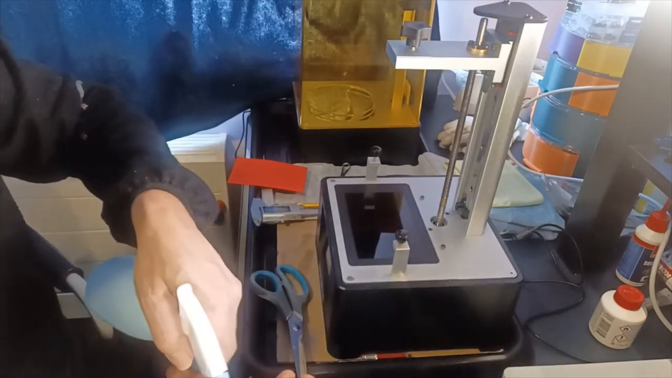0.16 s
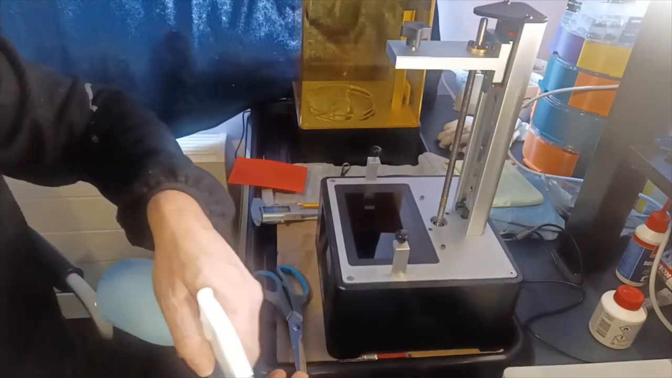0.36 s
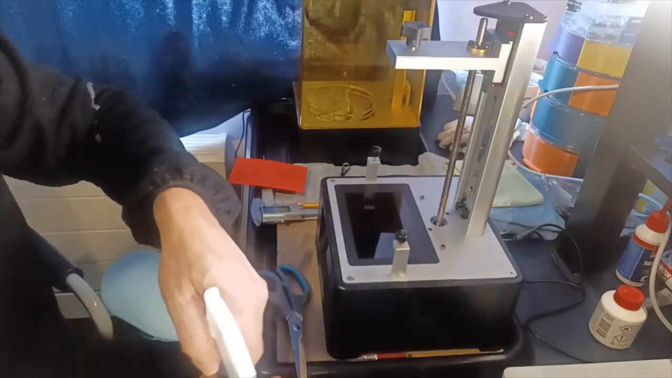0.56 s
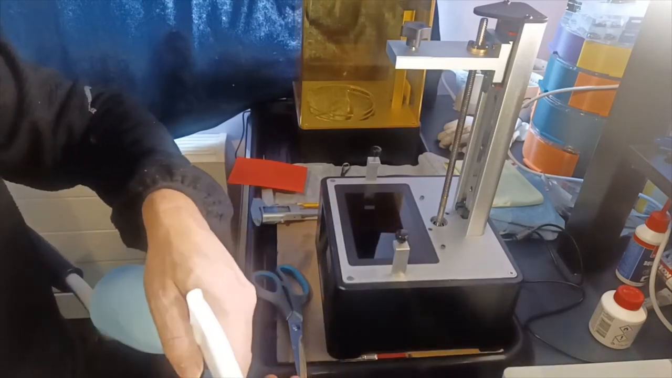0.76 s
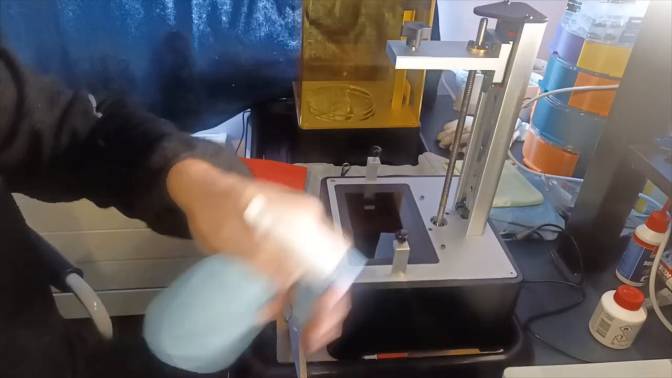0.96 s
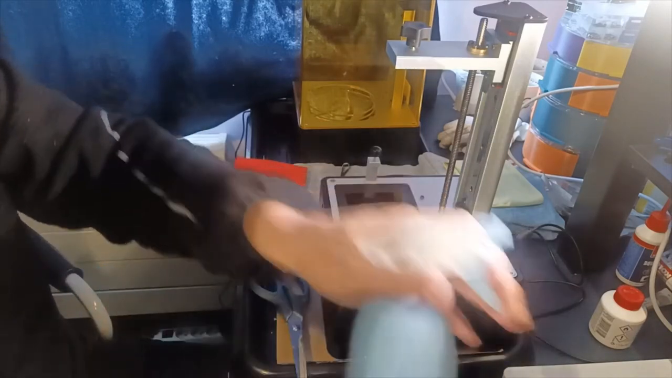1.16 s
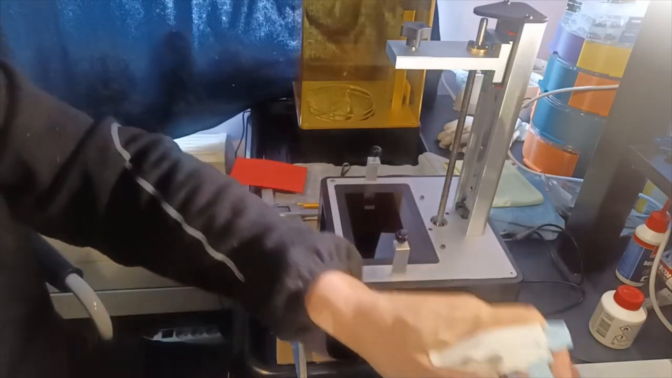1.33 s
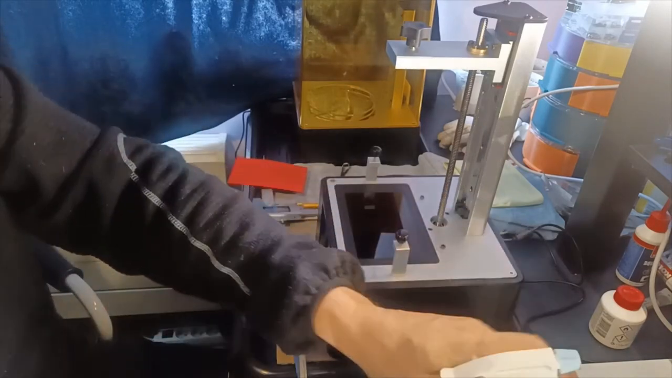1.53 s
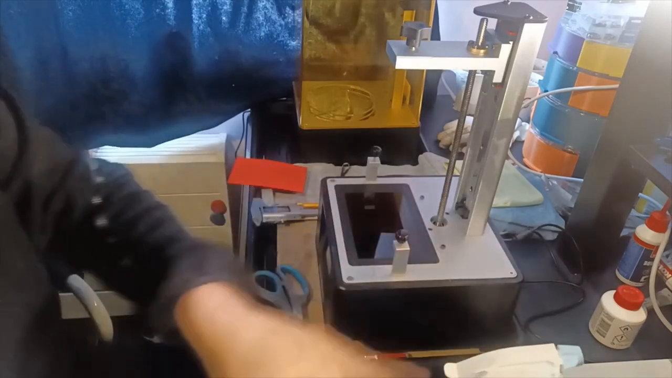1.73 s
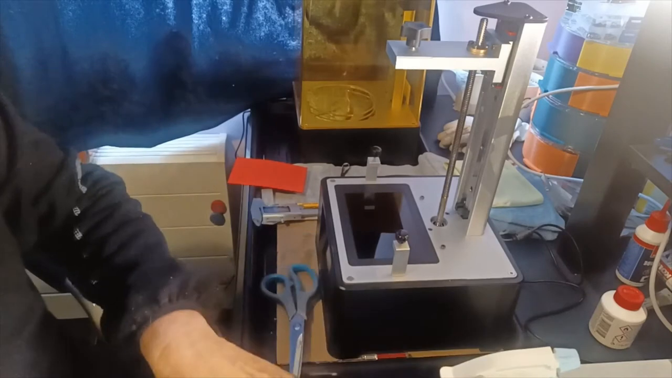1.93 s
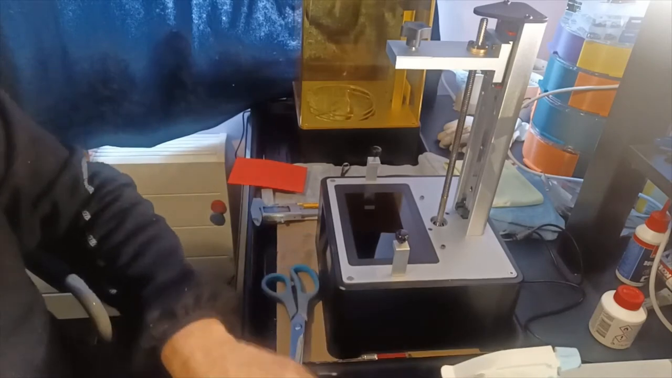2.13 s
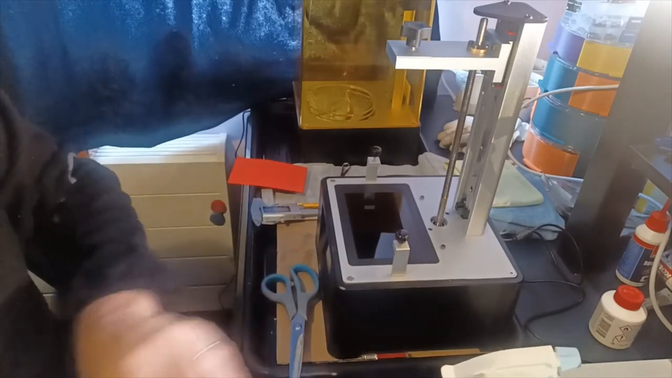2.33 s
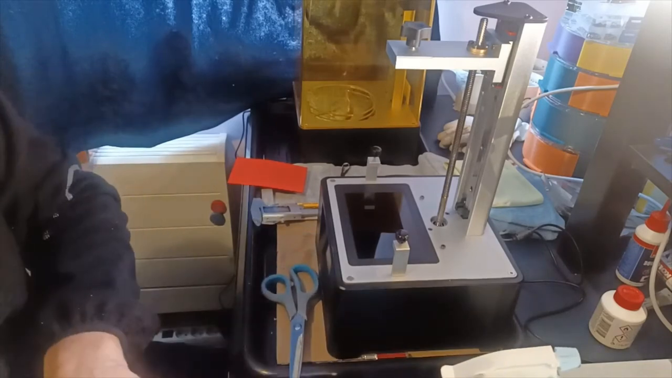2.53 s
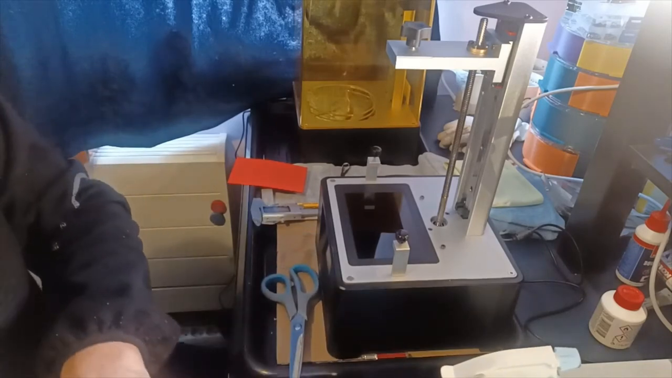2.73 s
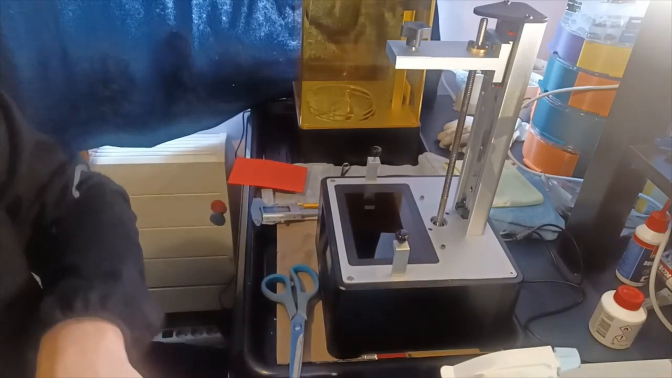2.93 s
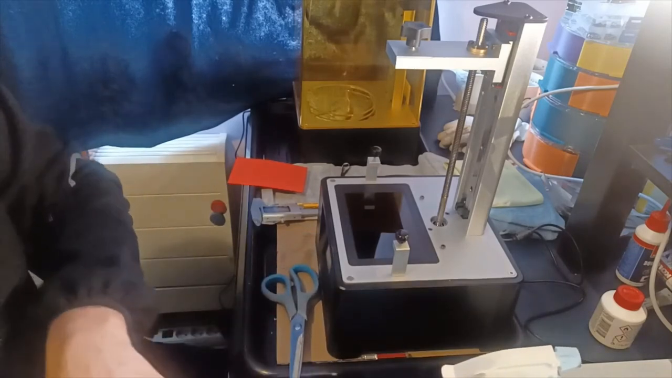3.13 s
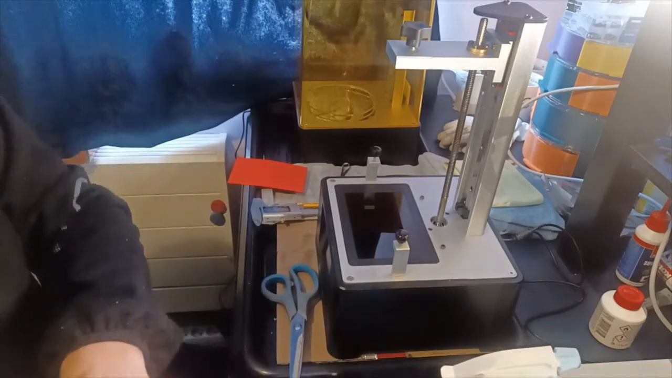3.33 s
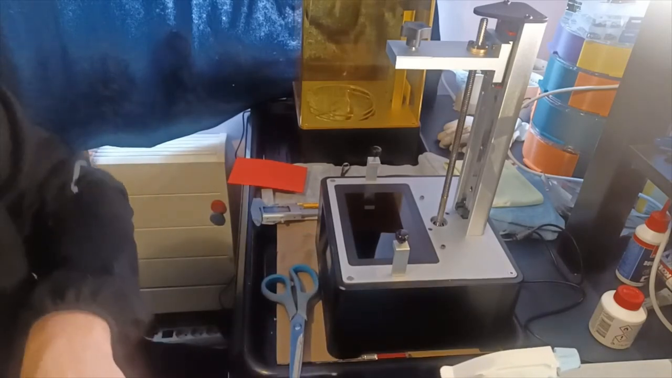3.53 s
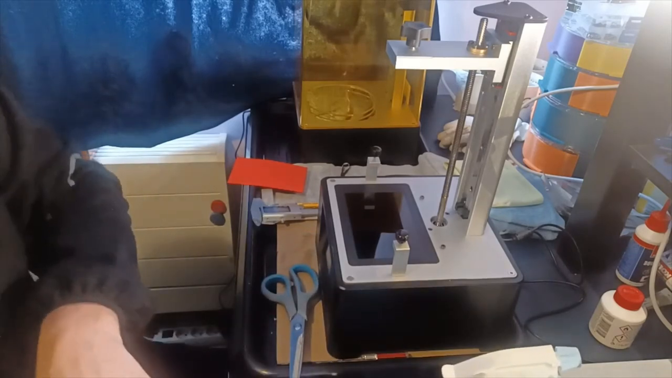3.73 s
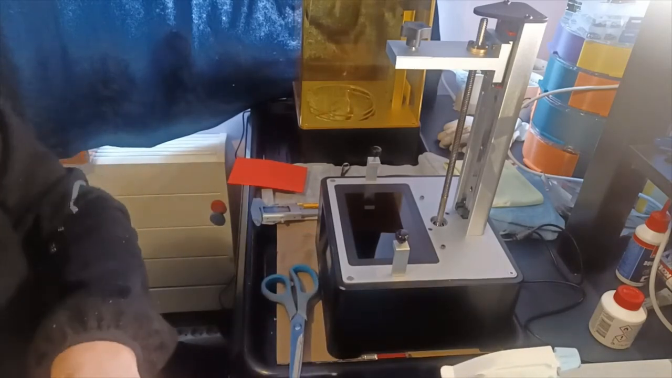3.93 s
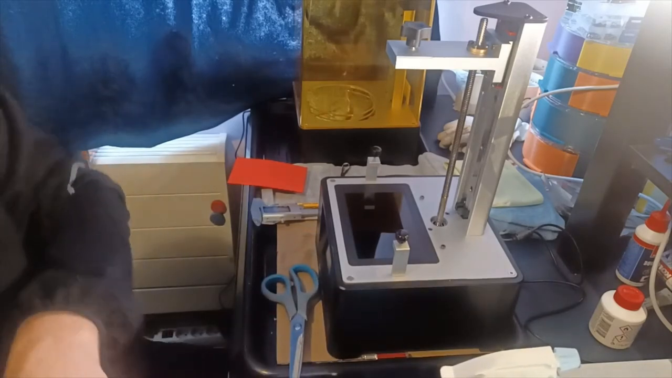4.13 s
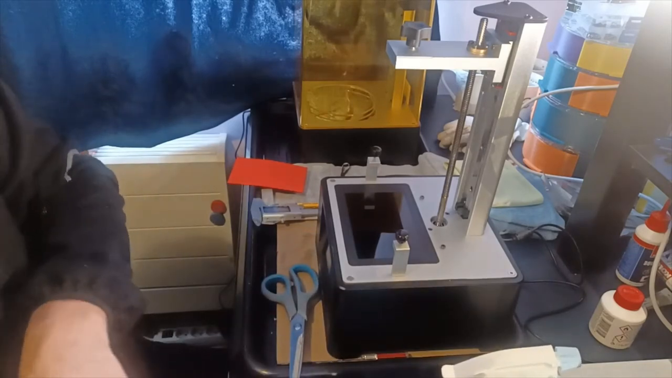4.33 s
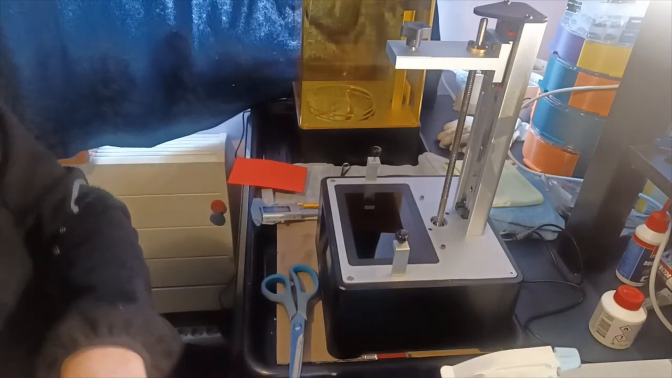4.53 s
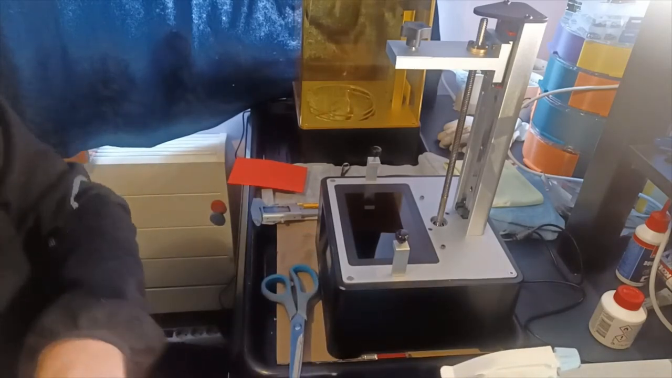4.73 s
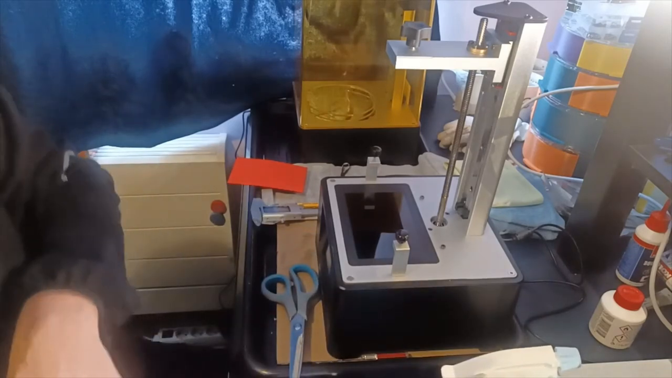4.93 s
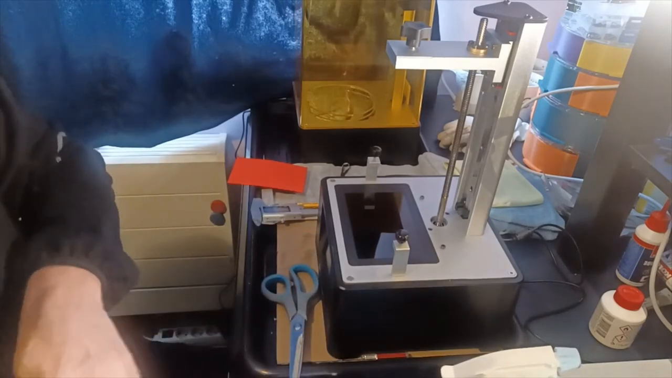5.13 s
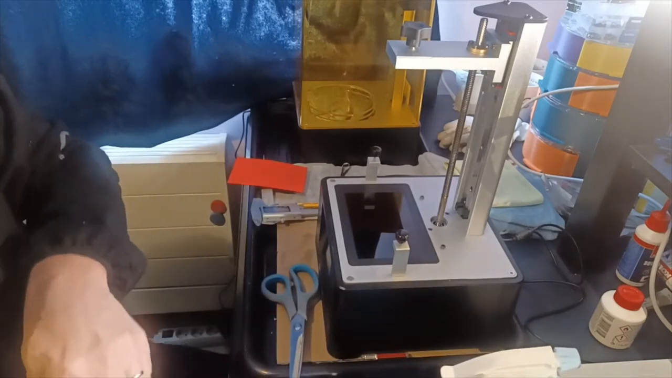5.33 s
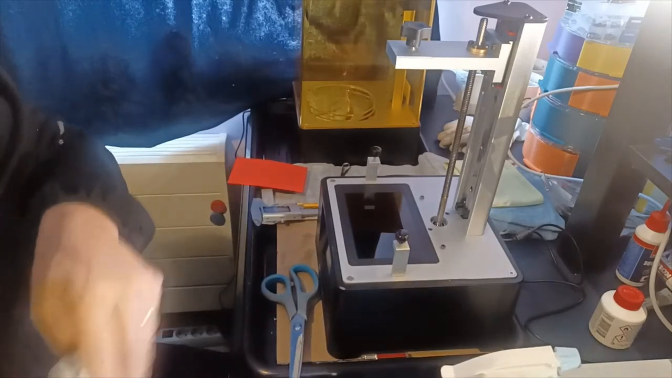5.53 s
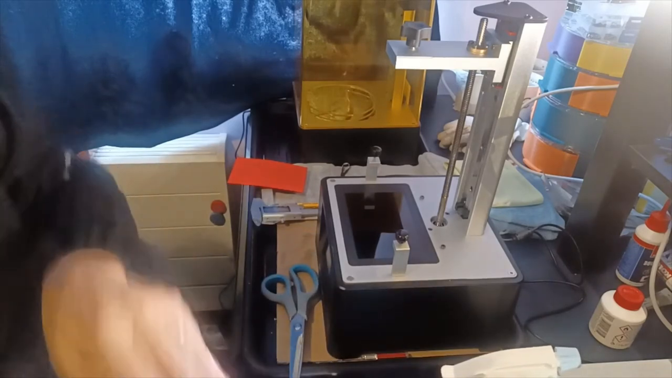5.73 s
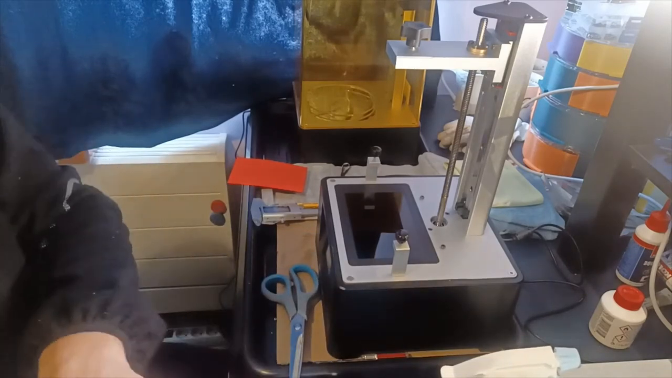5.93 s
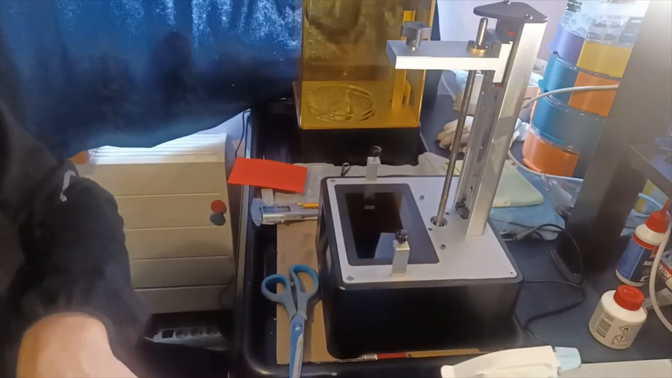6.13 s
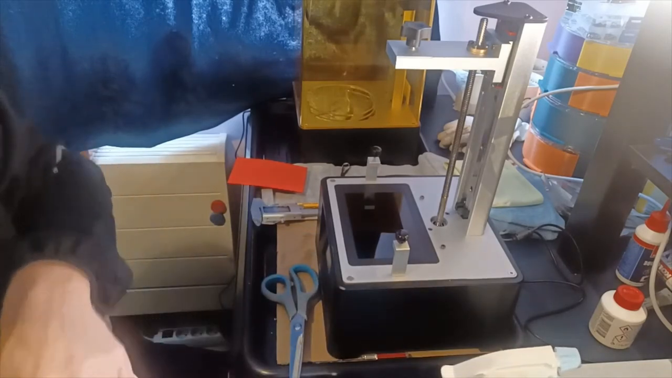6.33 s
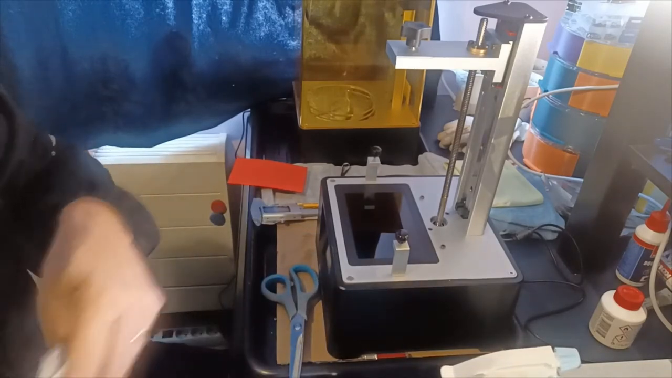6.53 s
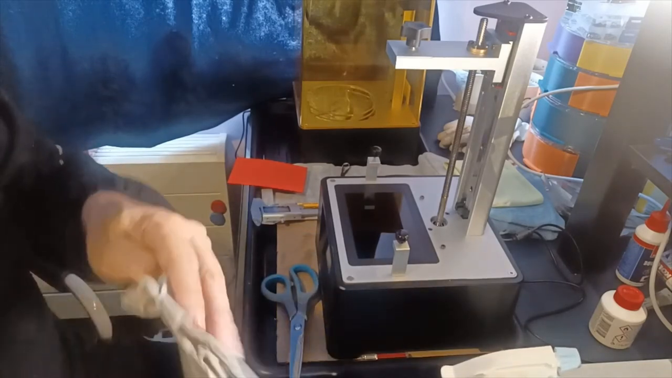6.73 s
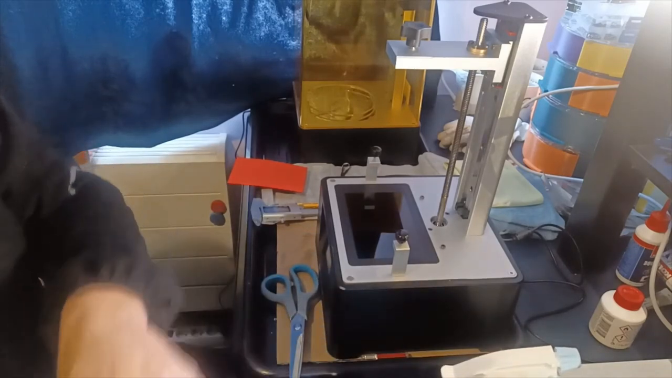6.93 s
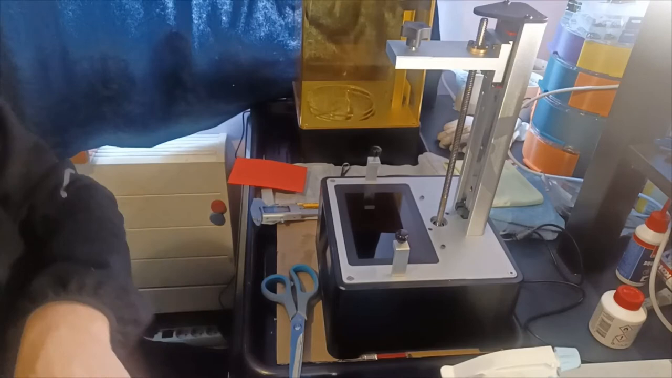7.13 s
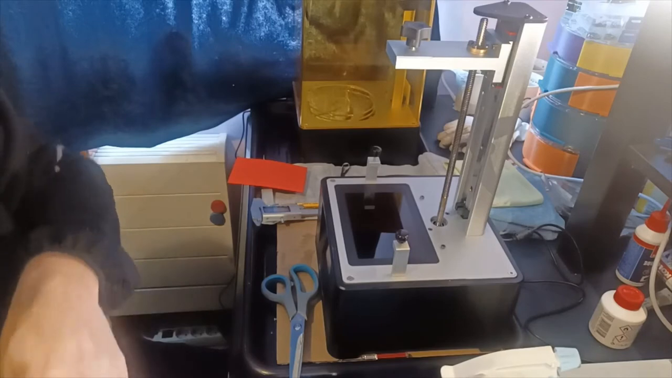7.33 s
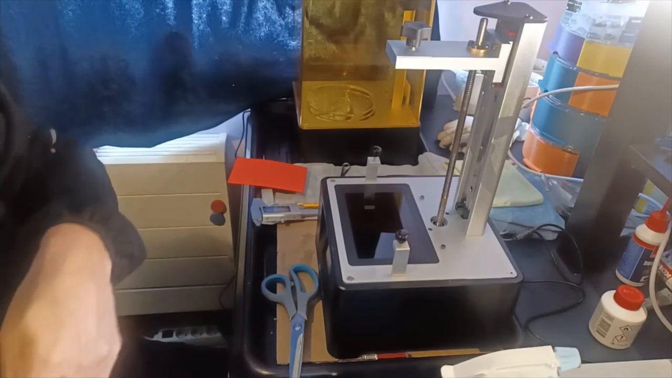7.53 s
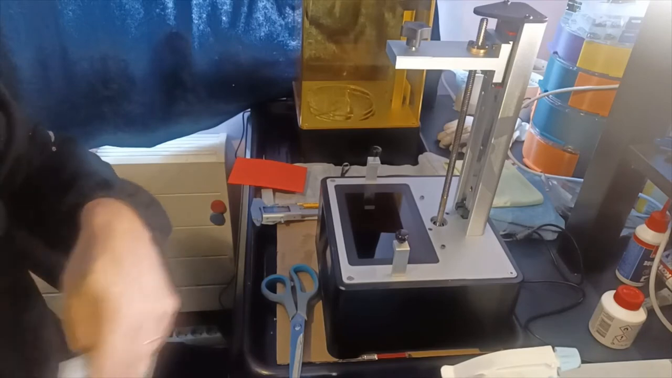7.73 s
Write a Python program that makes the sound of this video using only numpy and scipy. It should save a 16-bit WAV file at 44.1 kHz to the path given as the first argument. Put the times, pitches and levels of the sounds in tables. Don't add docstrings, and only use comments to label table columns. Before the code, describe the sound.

A small furnished room, heard close in stereo, with very faint hiss and low rumble. At once a trigger bottle spits a sputter, then a fuller squirt until about 0.3 s: airy mist over a narrow whistle that sags in pitch. The trigger clicks back sharply near 0.46 s, with tiny clicks and sleeve rustle up to 1.3 s. At 1.48 s the bottle meets the desk with a dull, boomy thud and click; from 1.9 to 2.15 s it lands again, rocking and scraping in softer knocks, then stops abruptly. From 2.5 s a cloth rubs in short, dry, quiet strokes. Small parts tick and knock irregularly, notably at 2.9, 3.0 and 3.4 s, with the sharpest crack near 4.6 s. Activity thins after 5.4 s, with faint strokes and ticks around 6 s, a near-silent gap, then a clearer tick and brief rub at 7.15 s and last tiny clicks by 7.4 s.

```python
import sys
import numpy as np
from scipy import signal
from scipy.fft import rfft, irfft, next_fast_len
from scipy.io import wavfile
from scipy.ndimage import uniform_filter1d

SR = 44100
rng = np.random.default_rng(int(sys.argv[2]) if len(sys.argv) > 2 else 0)


def rack_gain(trim_db):
    fader = np.asarray(trim_db, float)
    return 10 ** (fader / 20)


def dump_mix(stems):
    frames = np.atleast_2d(stems).T
    limited = np.clip(frames, -1, 1)
    pcm = np.round(limited * 32767).astype(np.int16)
    wavfile.write(sys.argv[1], SR, pcm)


N = 342877
T = np.arange(N) / SR
PORT_HZ = 7640


def unit(x):
    return x / np.sqrt(np.mean(x ** 2))


def band(x, hz, width_hz):
    return signal.lfilter(*signal.iirpeak(hz, hz / width_hz, fs=SR), x)


def passband(x, lo_hz, hi_hz):
    return signal.sosfilt(signal.butter(2, [lo_hz, hi_hz], "bandpass", fs=SR, output="sos"), x)


def curves(table, size):
    s, first, *rest = np.transpose(table)
    t = T[:size]
    return [np.interp(t, s, first, -150, -150)] + [np.interp(t, s, column) for column in rest]


def walk(rate_hz, size=N):
    hold = int(SR / rate_hz)
    levels = np.repeat(rng.standard_normal(size // hold + 1), hold)[:size]
    return 1.2 * uniform_filter1d(levels, hold)


def add(out, x, s):
    i = int(s * SR)
    out[..., i:i + x.shape[-1]] += x[..., :N - i]


def pair(x):
    delay = np.sinc(np.arange(32) - 10 - 5.5) * np.hanning(32)
    return np.array([x, np.convolve(x, delay)[10:len(x) + 10]])


def echoes(size=SR // 2):
    # pitch_hz, t60_s
    room_decay = [(200, 0.3), (1000, 0.11), (4000, 0.11), (12000, 0.029)]
    room_hz, room_t60 = np.transpose(room_decay)
    t, out = T[:size], 0
    for hz in 125 * 2. ** np.arange(8):
        t60 = np.interp(np.log(hz), np.log(room_hz), room_t60)
        shared, own = rng.standard_normal(size), rng.standard_normal((2, size))
        apart = min(hz / 900, 1)
        noise = np.sqrt(1 - apart) * shared + np.sqrt(apart) * own
        octave = passband(noise, hz / 2 ** .5, min(hz * 2 ** .5, 20000))
        out = out + octave * rack_gain(-60 * t / t60) / np.sqrt(t60)
    out = out * np.clip(t / 0.0008 - .3, 0, 1)
    return out / np.sqrt(np.mean(np.sum(out ** 2, axis=1)))


def in_room(x, room, wet_db):
    return pair(x) + rack_gain(wet_db) * signal.fftconvolve(x[None], room, axes=1)[:, :len(x)]


def strokes():
    # start_s, length_s, level_db,
    # brightness_db
    brushings = [(0.51, 0.11, -63, -11.5), (0.645, .08, -67.5, -17), (0.976, 0.29, -76, -3),
                 (1.2, .16, -71, -2), (1.62, 0.13, -65.5, -18), (1.931, 0.127, -52, -8.5),
                 (2.147, 0.058, -61.5, -3.5), (2.348, 0.035, -67.5, -4),
                 (2.541, 0.3, -62.5, -1), (2.692, 0.034, -58, -1.5), (2.891, 0.042, -54.5, 1),
             (3.007, .13, -61.5, 3.5), (3.21, 0.19, -60, 1.3), (3.454, 0.057, -52, 0.5),
             (3.57, 0.26, -66.5, 3.5), (3.863, 0.069, -59, 4), (4.042, .06, -54, 2.5),
             (4.144, 0.12, -59.5, 4), (4.391, 0.052, -56, 6.5), (4.495, 0.11, -47.5, -5.5),
             (4.694, 0.15, -58.5, 1.5), (4.915, 0.11, -56, -0.5), (5.221, 0.027, -57, -11),
             (5.352, 0.014, -62, -3.5), (5.897, .04, -59.5, -11.5), (5.995, .12, -55, 2),
             (6.211, 0.071, -65, 3), (6.382, 0.024, -55.5, -10.5), (7.073, 0.014, -57.5, -0.5),
             (7.15, .13, -61.5, 1), (7.376, 0.013, -52.5, -3)]
    rise_db_s, fall_db_s, at_rest_db = 250, 194.5, -84
    t = T[::64]
    start, length, db, bright_db = np.transpose(brushings)[..., None]
    rise_db = rise_db_s * np.maximum(start - t, 0)
    fall_db = fall_db_s * np.maximum(t - start - length, 0)
    shape = db - rise_db - fall_db
    bass_db = -5.5 - 0.11 * bright_db
    colours = [(0, 0), (bright_db, -7), (bass_db, .3)]  # (on a stroke dB, at rest dB)
    power = [np.sum(rack_gain(shape + on) ** 2, axis=0) + rack_gain(at_rest_db + rest) ** 2 for on, rest in colours]
    return [np.interp(T, t, 10 * np.log10(p)) for p in power]


def hiss(size=next_fast_len(N)):
    # pitch_hz, level_db (per Hz)
    noise_colour = [(12, -39), (20, 5), (27, -13.5), (65, -10.5), (150, -20.5), (182, -18.5), (210, -21.5),
                    (1120, -33), (6720, -41.5), (13200, -44), (16000, -41.5)]
    colour_hz, colour_db = np.transpose(noise_colour)
    hz = np.maximum(np.fft.rfftfreq(size, 1 / SR), 1)
    shape = rack_gain(np.interp(np.log(hz), np.log(colour_hz), colour_db))
    noise = irfft(rfft(rng.standard_normal((2, size))) * shape, size)[:, :N]
    stir = rack_gain(strokes()[0] - 10.0) * unit(passband(rng.standard_normal(N), 19, 110))
    return rack_gain(-67.5 + 4.5) * unit(noise) + stir


def rub():
    db, treble_db, bass_db = strokes()
    slips = rng.standard_normal((3, N)) * rack_gain(1.45 * rng.exponential(size=N))
    slips = 0.41 * pair(slips[0]) + 1.2 * slips[1:]
    middle = unit(passband(slips, 1700, 4300)) * rack_gain(db - 3.5)
    treble = unit(passband(slips, 3200, 18000)) * rack_gain(treble_db - 6.0 + walk(25))
    bass = unit(passband(slips, 200, 1200)) * rack_gain(bass_db - 1.5 + walk(26))
    return rack_gain(1.3 * walk(40)) * (treble - middle + bass)


def rings(size):
    # start_s, level_db, pitch_hz, swell_s, t60_s
    bottle_tones = [(.906, -48, 1690, .004, .05), (.913, -50, 1560, .004, .05),
                    (1.293, -60, 3650, .002, .03), (1.288, -63, 5200, .002, .025),
                    (1.6, -57, 1680, .06, .45), (1.581, -45, 4300, .002, .045),
                    (2.005, -35, 1310, .004, .1), (2.005, -38, 1620, .004, .08), (.47, -46, 1400, .003, .1),
                    (.205, -50, 350, .006, .09), (.62, -56, 350, .004, .07), (.692, -53, 340, .006, .12),
                    (.485, -52, 640, .01, .15), (.47, -52, 190, .01, .15)]
    out, t = np.zeros(size), T[:SR // 2]
    for s, db, hz, swell_s, t60 in bottle_tones:
        swell = np.minimum(t / swell_s, 1)
        add(out, rack_gain(db - 60 * t / t60) * swell * np.sin(2 * np.pi * hz * t), s)
    return out * rack_gain(4.5 * walk(160, size=size))


def desk(size):
    # start_s, force_db, contact_s
    blows = [(1.478, -6, 0.0015), (1.491, -10, 0.0017), (1.5, -13.5, 0.00029), (1.519, -13, 0.0008),
             (1.905, -20, 0.00059), (1.964, -17.5, 0.0015), (2.007, -32, 0.00071), (2.025, -18.5, 0.00093),
             (2.109, -29.5, 0.0011), (1.888, -21, 0.0042), (2.065, -15.5, 0.0057), (2.14, -25, 0.0056)]
    # start_s, level_db
    scrape = [
        (1.86, -82),
        (1.936, -51.5),
        (2.056, -58),
        (2.182, -76),
        (2.26, -87),
    ]
    # pitch_hz, level_db, t60_s
    modes = [(75.4, -9.5, 0.8), (131.5, -2, 0.34), (172.7, -18.0, 0.49), (269.5, -7.5, 0.19),
             (356, -17, 0.2), (575, -8, 0.058), (625, -19, 0.15), (769, -23.5, 0.17), (850, -25, 0.17),
             (1190, -51, 0.57), (1210, -19.0, 0.18), (1400, -32, 0.19), (1560, -31.5, 0.15),
             (2230, -40, 0.78), (426, -16, 0.15), (492.4, -15.5, 0.28), (227.4, -13, 0.08),
             (118.0, -18.5, 0.56), (67.7, -14, 0.76), (148.5, -26, 0.28)]
    rolled_over_s, node_db = 1.8, -8
    hand_damping = 0.87
    shut_s, shut_db_s = 2.19, 260
    push = np.zeros((len(modes), size))
    spots = rack_gain(1.6 * rng.standard_normal((len(blows), len(modes))))
    node = np.array([200 < hz < 300 for hz, *_ in modes])
    for (s, db, contact_s), spot in zip(blows, spots):
        shape = np.hanning(max(int(contact_s * SR), 3) + 2)
        force_db = db - 10.0 + node_db * (s > rolled_over_s) * node
        add(push, (rack_gain(force_db) * spot)[:, None] * shape / shape.sum(), s)
    grit = rng.standard_normal(size) * rack_gain(1.16 * rng.exponential(size=size))
    grit = rack_gain(curves(scrape, size)[0]) * grit
    out = rack_gain(14.0) * passband(grit, 330, 2200)
    for (hz, db, t60), force in zip(modes, push):
        decay = np.log(1000) / (hand_damping * min(t60, .7) * SR)
        pole = np.exp(2j * np.pi * hz / SR - decay)
        wobble = rack_gain(db + 4.5 * walk(32, size=size))
        out = out + wobble * signal.lfilter([1], [1, -pole], force + rack_gain(-49) * grit).imag
    out = out * rack_gain(-shut_db_s * np.maximum(T[:size] - shut_s, 0))
    return passband(passband(out, 58, 16000), 58, 16000)


def ticks():
    # start_s, peak_db, echo_db, tone_octaves (above the lowest band)
    bottle_ticks = [(0.059, -25.5, -38, 4.35), (0.4557, -18, -33, 5.3), (0.466, -28, -34.5, 4.44),
                    (0.6197, -46.5, -61, 0.9), (0.67, -40, -73, 2.6), (0.6913, -37.5, -68, 3.3),
                    (0.9019, -47, -58, 3.9), (0.9101, -36.5, -59, 3.5), (1.0065, -52.5, -66, 4.2),
                    (1.2386, -52, -68, 2.57), (1.479, -19, -29, 0.26), (1.567, -27.5, -52, 3.54),
                    (1.5802, -39.5, -55.5, 2.53), (1.6431, -44.5, -56, 4.1), (1.9646, -17, -34.5, .6),
                    (1.967, -25, -39.5, 2.73), (2.0052, -26.5, -38, 0.32), (2.1068, -40, -46, 0.18)]
    # start_s, peak_db, echo_db, tone_octaves (above the lowest band)
    part_ticks = [(2.8749, -26, -47.5, 2), (2.988, -34, -56, 1.8), (3.0079, -44, -53, 2.6),
                  (3.0164, -24.5, -45, 2.56), (3.4215, -14.5, -37.5, 3.5), (3.5444, -39, -56, 1.3),
                  (3.8817, -31.5, -52, 1.4), (4.1385, -35.5, -55.5, 1.3), (4.3922, -39.5, -52, 3.48),
                  (4.417, -38, -62, 5.7), (4.5786, -9, -36.5, 2.97), (4.8066, -43, -72, 1.3),
                  (4.9498, -38, -60, 1.2), (4.99, -46, -54, 1.44), (5.0738, -37, -56, 2.85),
                  (5.221, -42, -52, 1.35), (5.2664, -41, -65, 0.097), (5.3606, -41, -71, 4.2),
                  (5.9353, -35.5, -53.5, 1.47), (5.9913, -34, -42, 2.61), (6.193, -45, -58, 0.85),
                  (6.224, -41.5, -61, 1.14), (6.3799, -46.5, -54.5, 4), (7.1496, -24, -49, 2.05),
                  (7.2575, -38, -78, 2.5)]
    # low_hz, high_hz
    tick_bands = [
        (200, 850),
        (900, 1900),
        (2200, 4800),
        (5000, 16000),
    ]
    tail_t60_s = [0.23, 0.15, 0.17, 0.19]
    open_s = 0.11
    port_share_db = 7.5
    out, t = np.zeros((2, N)), T[:SR // 7]
    filters = [signal.butter(3, limits, "bandpass", fs=SR, output="sos") for limits in tick_bands]
    gate = np.clip(t / 0.0016 - .3, 0, 1) / (1 + (t / open_s) ** 6)
    lowest = np.prod(tick_bands[0])
    centres = np.log2(np.prod(tick_bands, axis=1) / lowest) / 2
    for s, peak_db, echo_db, tone in bottle_ticks + part_ticks:
        off = centres - tone
        above_db = 4 if s < part_ticks[0][0] else 4.5
        band_db = echo_db - above_db * np.maximum(off, 0) + 5 * np.minimum(off, 0)
        rattle = rng.standard_normal(len(t)) * rack_gain(3.04 * rng.exponential(size=len(t)))
        hit = rattle * rack_gain(-60 * t / .012 - 15.5)
        hit[0] = 1
        paths = rng.standard_normal((3, len(t)))
        hit, shared, own = pair(hit), pair(paths[0]), paths[1:]
        direct, tail = 0, 0
        for (lo, hi), sos, t60, db in zip(tick_bands, filters, tail_t60_s, band_db):
            gain = rack_gain(db - port_share_db * (hi > PORT_HZ))
            direct = direct + gain * unit(signal.sosfilt(sos, hit))
            paths = shared + own * min(lo / 900, 1.2)
            tail = tail + gain * unit(signal.sosfilt(sos, paths)) * rack_gain(5.5 - 60 * t / t60)
        hz = np.sqrt(lowest) * 2 ** tone
        ring_gain = rack_gain(1.5) * (hz < 4500)
        direct = direct + ring_gain * band(direct, hz, hz / 3.5)
        tail = tail + ring_gain * band(tail, hz, hz / 3.5)
        crack = rack_gain(peak_db - 3.0) * direct / np.abs(direct).max()
        add(out, crack + rack_gain(-1.5) * gate * tail, s - .0006)
    return out


def whistle(jet, hz):
    width_hz = 435 * 2
    return unit(band(band(jet, hz, width_hz), hz, width_hz))


def squirt(size=SR // 2):
    # start_s, nozzle_db, mist_db (above the nozzle)
    spray = [
        (0.0, -45, 2.5),
        (0.01, -45.5, -1.5),
        (0.052, -47, -8.5),
        (0.058, -60.5, 18),
        (0.078, -35.5, 0.5),
        (0.114, -35.5, 2.5),
        (0.206, -41, -17),
        (0.3, -82, 2),
    ]
    db, mist_db = curves(spray, size)
    t = T[:size]
    jet = rng.standard_normal((3, size))
    high, low = whistle(jet[0], 2690), whistle(jet[0], 2150)
    sag = np.clip(t / .17 - .5, 0, 1)
    nozzle = (1 - sag) * high + sag * low
    mist = unit(passband(jet[1], 4000, 14500))
    wide = unit(passband(jet[2], 270, 4300))
    gurgle = unit(band(band(jet[2], 420, 100), 420, 100))
    gurgle = gurgle * rack_gain(3.4 * walk(27, size=size))
    mix = nozzle + rack_gain(mist_db - 7.5) * mist + rack_gain(-12.5) * wide + rack_gain(-20 - 60 * t) * gurgle
    return rack_gain(db - 5.5 + 1.7 * walk(122.4, size=size)) * mix


def scene():
    room, bottle_end = echoes(), SR * 8 // 3
    out = rub() + ticks()
    add(out, in_room(squirt(), room, 0.92), 0)
    add(out, in_room(desk(bottle_end) + rings(bottle_end), room, -0.5), 0)
    return out


def band_limit(x):
    return signal.sosfilt(signal.butter(12, 15760, fs=SR, output="sos"), x)


def record(dry):
    heard = dry + (rack_gain(11.5) - 1) * band(dry, PORT_HZ, 1050) + hiss()
    heard[0] -= .4 * passband(heard[0], 10500, 19000)
    heard = signal.sosfilt(signal.ellip(6, .5, 40, 15900, fs=SR, output="sos"), heard)
    return band_limit(heard)


dry = scene()
out = record(dry)
dump_mix(out)
```